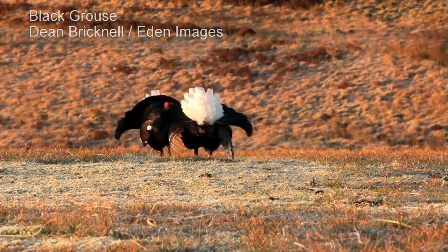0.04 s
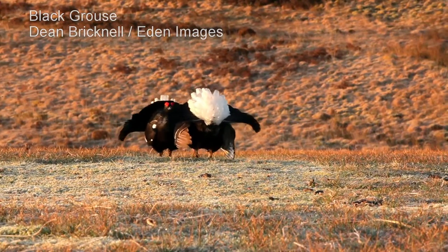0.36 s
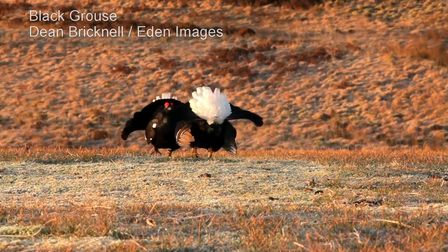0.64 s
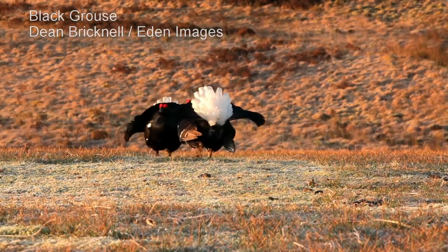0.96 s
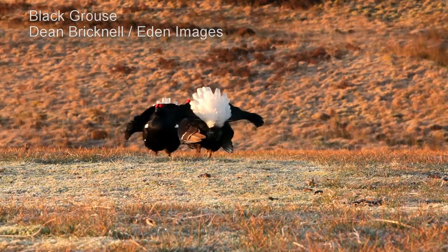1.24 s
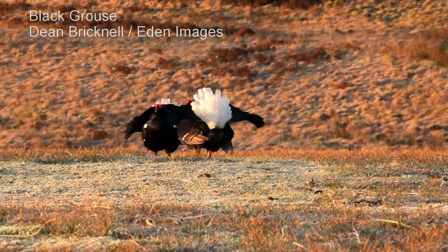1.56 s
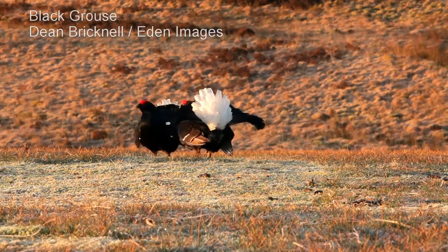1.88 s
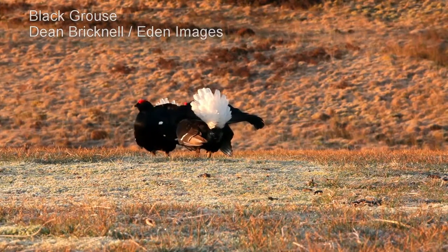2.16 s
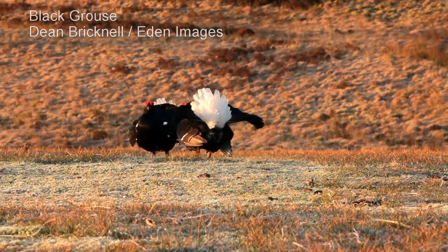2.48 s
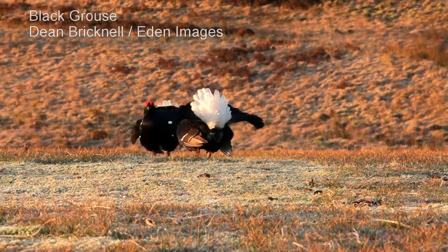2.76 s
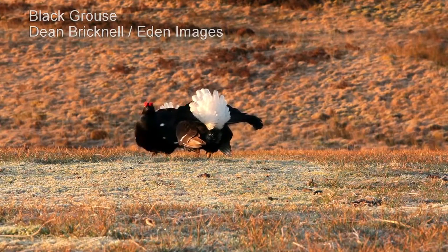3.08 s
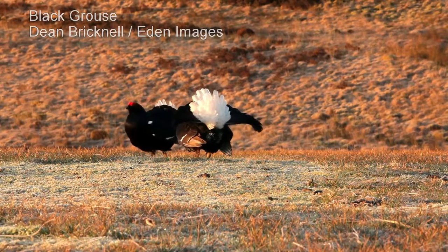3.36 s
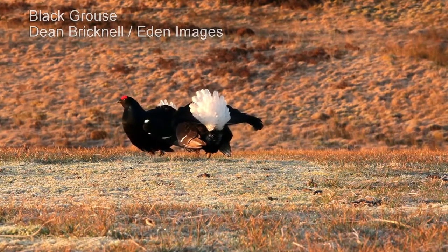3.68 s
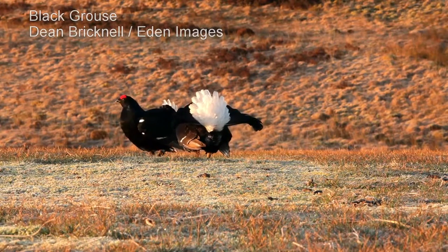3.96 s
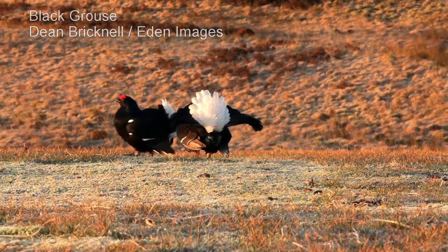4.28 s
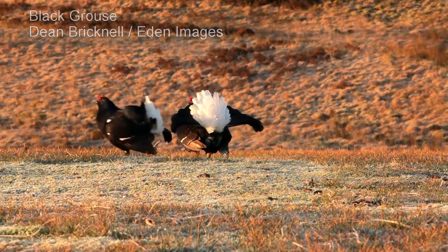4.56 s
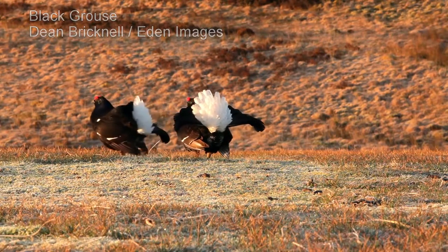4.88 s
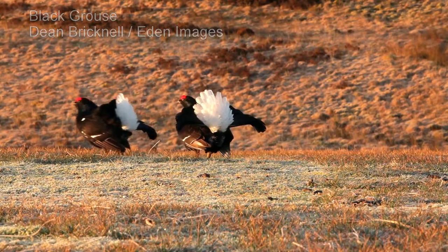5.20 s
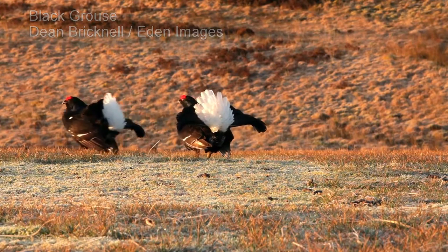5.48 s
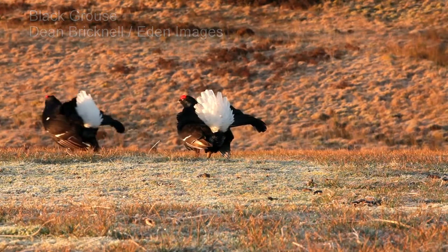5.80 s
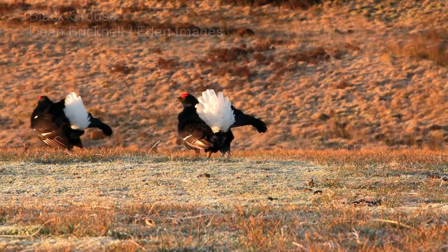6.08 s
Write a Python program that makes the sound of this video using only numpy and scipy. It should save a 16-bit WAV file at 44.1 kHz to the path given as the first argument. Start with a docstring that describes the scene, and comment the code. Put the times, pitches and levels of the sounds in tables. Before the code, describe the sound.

Low, rolling, bubbling coos of male grouse overlap over faint outdoor air, and a short rasping hiss comes late.

```python
"""Black grouse cocks sing one bubbling song over one another on open moorland: a climbing roll, then a
flourish of coos, each a gliding, nearly pure tone shaped by the resonance of the air sac.
Hoarse clucks sound at the start; near the end, air forced through a throat makes a harsh hiss.
Feathers rustle by friction, and feet tick and scuff in the frosty grass. Far birds whistle over
the soft rush of open air, an intermittent low hum and a faint steady whine."""
import sys
import numpy as np
from scipy import signal
from scipy.fft import rfft, irfft
from scipy.io import wavfile

SR = 44100
rng = np.random.default_rng(int(sys.argv[2]) if len(sys.argv) > 2 else 0)


def inscribe(sig):
    """Save sig as 16-bit PCM at rate SR to the path in sys.argv[1].

    A 1-D sig is mono; a 2-D sig holds one channel per row.
    Samples are clipped to [-1, 1] before scaling.
    """
    pcm = np.round(np.clip(np.atleast_2d(sig).T, -1, 1) * 32767)
    wavfile.write(sys.argv[1], SR, pcm.astype(np.int16))


N = 275184
TIME = np.arange(N) / SR

# Levels are relative within each source.
# Renditions of the song: start t/s, time stretch, pitch ratio, level/dB
RENDITIONS = [(-1.135, .9985, .997, 1.8), (1.448, .972, .98, -5.2), (2.759, 1, 1, 0),
              (3.870, .9795, .985, -4.8)]
# Coos, before any stretch or pitch ratio: t/s, duration/s, top f/Hz, level/dB, place of the top (0-1)
FLOURISH_COOS = [(0.735, 0.064, 568.0, -16.0, 0.39), (0.819, 0.035, 575.0, -14.2, 0.15),
                 (0.87, 0.035, 606.0, -15.0, 0.08), (1.161, 0.036, 563.0, -15.9, 0.24),
                 (1.262, 0.027, 607.0, -14.5, 0.14), (1.363, 0.025, 492.0, -17.8, 0.37),
                 (1.396, 0.038, 583.0, -18.1, 0.0), (1.451, 0.026, 496.0, -17.8, 1.0),
                 (1.483, 0.035, 482.0, -14.3, 0.5), (1.524, 0.077, 593.0, -19.6, 0.56),
                 (1.562, 0.029, 486.0, -21.1, 0.0), (1.648, 0.043, 538.0, -19.5, 0.0),
                 (1.759, 0.082, 523.0, -22.7, 0.41), (1.796, 0.04, 538.0, -14.6, 0.63),
                 (1.847, 0.059, 608.0, -20.9, 1.0), (1.892, 0.025, 499.0, -16.6, 0.76),
                 (1.95, 0.028, 596, -11.5, 0.46), (2.022, 0.07, 620, -10.3, 0.45),
                 (2.094, 0.152, 579.0, -23.2, 0.58), (2.103, 0.04, 582.0, -18.3, 1.0),
                 (2.129, 0.051, 501.0, -23.7, 0.74), (2.202, 0.029, 508.0, -14.3, 0.25)]  # t from the start of the song
SINGLE_COOS = [(0.233, 0.039, 574.0, -20.8, 0.3), (0.384, 0.046, 515.0, -17.2, 0.0),
               (0.461, 0.03, 483.0, -15.7, 0.0), (0.849, 0.026, 570.0, -21.6, 0.03),
               (0.877, 0.037, 424.0, -22.4, 0.76), (1.068, 0.054, 486.0, -20.3, 0.56),
               (1.152, 0.03, 552.0, -19.9, 0.11), (1.287, 0.027, 573.0, -16.9, 0.0),
               (1.362, 0.027, 581.0, -21.6, 0.0), (1.778, 0.073, 438.0, -19.0, 1.0),
               (2.352, 0.03, 444.0, -20.7, 0.0), (2.62, 0.076, 409.0, -23.1, 0.49),
               (2.69, 0.025, 453.0, -21.5, 0.68), (2.818, 0.118, 439.0, -19.2, 0.65),
               (3.795, 0.025, 582.0, -20.4, 0.0), (4.09, 0.053, 426.0, -19.8, 0.32),
               (4.288, 0.025, 479.0, -15.0, 0.55), (4.312, 0.073, 436.0, -18.6, 0.47),
               (5.28, 0.047, 451.0, -18.9, 0.58), (5.602, 0.061, 480.0, -21.9, 0.67),
               (5.712, 0.03, 540, -19.5, 0.2)]
# Radiation response of the air sac: f/Hz, gain/dB
SAC_RESPONSE = [(270, -24), (335, -6), (390, 0.5), (620, -0.5), (670, -12), (760, -29)]
# Cocks further off
CHORUS_ENVELOPE = [(0, -38), (1.05, -34.5), (1.22, -49), (1.5, -36), (1.85, -33), (2.2, -36), (2.45, -42),
                   (2.9, -36), (3.1, -41), (3.55, -37), (3.75, -40), (4.3, -32), (4.85, -35), (5.08, -43),
                   (5.4, -38), (6.24, -39)]  # t/s, level/dB
CHORUS_CONTOUR = [(1.1, 493), (1.5, 410.3), (1.9, 444), (2.2, 481.5)]  # t/s, base f/Hz
# Nasal clucks
CLUCK_NOTES = [(-.02, .04, -30.5, 541, 540, 510), (0.014, 0.055, -39.5, 525, 555, 560),
               (.078, 0.039, -31, 570, 548, 497), (0.136, 0.028, -39.5, 540, 514, 515)]  # t/s, duration/s, level/dB, start f/Hz, middle f/Hz, end f/Hz
CLUCK_HARMONICS = [(1, 1.5), (2, -0.5), (3, -1), (4, -16)]  # harmonic number, level/dB
# The hiss: its sinking half-whistle, throat resonances and broadband breath
HISS_GLIDE = [(5.47, 3080, -56), (5.52, 3020, -45), (5.62, 2830, -48), (5.72, 2740, -48), (5.8, 2600, -55),
              (5.88, 2380, -53), (5.96, 1850, -60)]  # t/s, f/Hz, level/dB
THROAT_FORMANTS = [(5.435, .1, -45.5, 790, 5980), (5.45, .082, -51, 350, 4250),
                   (5.547, .49, -51, 900, 5700), (5.583, .18, -48.5, 700, 7280),
                   (5.6, .33, -53.5, 400, 3900), (5.62, .3, -51, 350, 4900), (5.649, .24, -45.5, 180, 1310),
                   (5.7, .29, -50, 1300, 8300)]  # t/s, duration/s, level/dB, width/Hz, centre f/Hz
BREATH_ENVELOPE = [(5.42, -56), (5.5, -46.5), (5.58, -46.5), (5.69, -42.5), (5.8, -42.5), (5.9, -43.5),
                   (6.0, -58)]  # t/s, level/dB
BREATH_SPECTRUM = [(1200, -30), (2400, -4), (3600, -2.5), (7000, -3), (9500, -5.5), (12000, -10.5),
                   (15800, -22)]  # f/Hz, level/dB
# Ticks of feet and quills: t/s, level/dB, centre f/Hz
SNAPS = [(0.1141, -36.5, 6940), (0.3097, -37.5, 7810), (0.3501, -39, 7280), (0.4369, -39.5, 6170),
         (0.9598, -39.5, 6360), (1.1443, -40.5, 8520), (2.6996, -41.5, 7180), (3.6905, -41.5, 6210),
         (4.5096, -40, 3430), (5.1454, -27.5, 7160)]
# Wings and feet on the turf
SCUFF_STROKES = [(0.193, .02, -55), (2.378, 0.023, -46.5), (4.229, 0.026, -44), (4.256, 0.039, -47),
                 (4.283, 0.088, -43.5), (4.501, 0.023, -47), (6.044, 0.023, -43.5), (6.075, .02, -50),
                 (6.105, 0.076, -44)]  # t/s, duration/s, level/dB
SCUFF_SPECTRUM = [(500, -7), (1300, 5.5), (3500, 4), (7500, 1.5), (10000, -20), (16000, -21)]  # f/Hz, level/dB
# Rubbing feathers
RUSTLE_ENVELOPE = [(0.06, -47), (0.28, -56.5), (0.7, -54.5), (1.0, -51), (1.6, -60), (2.17, -48),
                   (2.55, -60.5), (3.4, -53), (4.0, -62.5), (5.4, -62)]  # t/s, level/dB
RUSTLE_SPECTRUM = [(2000, -17), (3800, -3.5), (4600, -2), (7800, 0.5), (10000, -14.5), (16000, -20)]  # f/Hz, level/dB
# Long notes of far birds, and a small bird's quick chirps
FAR_NOTES = [(.167, .26, -48, 1635), (.494, .26, -54.5, 1725), (.5, .75, -61, 4620), (.9, .11, -53, 1785),
             (1.17, .3, -56.5, 2300), (1.42, .1, -53, 1795), (1.648, .39, -57, 2370),
             (2.152, .29, -56.5, 2350), (2.619, .3, -58.5, 2340)]  # t/s, duration/s, level/dB, f/Hz
CHIRP_NOTES = [(2.342, .045, -53, 4150, 3950, 3800), (2.386, .13, -55, 5050, 5350, 4850),
               (5.99, .025, -53, 3550, 4800, 5400)]  # t/s, duration/s, level/dB, start f/Hz, middle f/Hz, end f/Hz
# Open air, and a breeze over the far slope
AIR_SPECTRUM = [(20, -7), (40, -9), (75, 3.5), (130, 2), (260, 4.5), (750, -4.5), (1400, -4), (2200, -10),
                (3500, -14), (8000, -16.5), (11000, -22), (16000, -23.5)]  # f/Hz, level/dB
BREEZE_ENVELOPE = [(1.2, -69), (2.6, -56.5), (3.5, -52), (4.6, -56), (6.2, -61)]  # t/s, level/dB
# Faint background tones
HUM_TONES = [(-.1, 0.64, -56, 71), (2.5, 1.05, -59.5, 76), (5.42, .62, -60.5, 69.9)]  # t/s, duration/s, level/dB, f/Hz
WHINE_TONES = [(2929, -67.5), (7812.5, -67.5), (9765.6, -70), (11718.7, -73.5)]  # f/Hz, level/dB


def coo(length, top_hz, db, top_at, rest_hz=390, sac_hz=493, sac_width_hz=92, droop_hz=74, droop_s=.006):
    """Forced resonance: an arching tone is reinforced as it sweeps through the air sac's frequency."""
    way = np.linspace(0, 1, max(int(length * SR), 8))
    hz = top_hz - (top_hz - rest_hz) * ((way - top_at) / max(top_at, 1 - top_at)) ** 2
    sac_gain = 1 / np.hypot(1, 2 * (hz - sac_hz) / sac_width_hz)
    hz = hz - droop_hz * np.exp((way - 1) * length / droop_s)  # the pitch droops at the last moment
    quiver_db = 1.6 * drift(len(way), rate=130)
    swell = abs(np.sin(np.pi * way)) ** .72 * amp(db + quiver_db)
    return swell * sac_gain * np.sin(2 * np.pi * (np.cumsum(hz) / SR + rng.random()))


def roll(count=11, start_s=-.031, step_s=.0709, first_hz=428, last_hz=558, first_db=-26, last_db=-14.5):
    """Periodic repetition: rows for the song's opening coos, which shorten, swell and climb late."""
    notes = []
    for k, way in enumerate(np.linspace(0, 1, count)):
        length = .063 * (1 - .22 * way)
        top_hz = first_hz + (last_hz - first_hz) * way ** 3.5
        db = first_db + (last_db - first_db) * way
        notes.append((start_s + k * step_s, length, top_hz, db, .05))  # early top: each note falls
    return notes


def near_cocks(song_db=.2, single_db=-.2):
    """Superposition: each cock sings at his own pace, pitch and level; others add single coos."""
    out = np.zeros(N)
    for start, stretch, ratio, level_db in RENDITIONS:
        for s, length, top_hz, db, top_at in roll() + list(FLOURISH_COOS):
            onset = start + s * stretch
            if onset > -length:
                add(out, onset, coo(length * stretch, top_hz * ratio, song_db + level_db + db, top_at))
    for s, *note in SINGLE_COOS:
        add(out, s, amp(single_db) * coo(*note))
    return out


def far_cocks(level_db=-1.0, note_s=.052, pitch_spread=.12, count=200):
    """Incoherent summation: many falling coos of random phase merge into a distant bubbling."""
    out = np.zeros(N)
    for k, (late, high, long) in enumerate(rng.uniform(-1, 1, (count, 3))):
        onset = (k + late / 2) / count * N / SR - note_s / 2
        hz = contour(onset, CHORUS_CONTOUR) * (1 + pitch_spread * high)
        swell, phase = arch(note_s * (1 + .28 * long), hz * 1.03, hz * 1.08, hz * .8, crest=.68)
        add(out, onset, swell * np.sin(phase))
    return unit_rms(out) * amp(level_db + contour(TIME, CHORUS_ENVELOPE))


def clucks(jitter_rad=.16):
    """Phase modulation: random jitter makes the harmonics of short, open-beaked notes hoarse."""
    out = np.zeros(N)
    for s, length, db, *pitches in CLUCK_NOTES:
        swell, phase = arch(length, *pitches)
        phase = phase + jitter_rad * drift(len(phase), rate=220)
        tone = sum(amp(db + part_db) * np.sin(round(k) * phase) for k, part_db in CLUCK_HARMONICS)
        add(out, s, swell * tone)
    return out


def hiss(rasp_db=1.4, rasp_hz=300, whistle_width_hz=260):
    """Source and filter: throat resonances shape forced air into a sinking whistle and a rasping rush."""
    whistle, rush = np.zeros(N), np.zeros(N)
    s, hz, db = np.transpose(HISS_GLIDE)
    t = np.arange(s[0], s[-1], 1 / SR)
    glide = resonant_noise(len(t), np.interp(t, s, hz), whistle_width_hz)
    add(whistle, s[0], amp(np.interp(t, s, db)) * glide)
    for s, length, db, width, hz in THROAT_FORMANTS:
        swell, _ = arch(length, hz, hz, hz)
        add(rush, s, amp(db) * np.sqrt(swell) * resonant_noise(len(swell), hz, width))
    s, db = np.transpose(BREATH_ENVELOPE)
    t = np.arange(s[0], s[-1], 1 / SR)
    breath = coloured(rng.standard_normal(len(t)), BREATH_SPECTRUM)
    add(rush, s[0], breath * amp(np.interp(t, s, db)))
    return (whistle + windpipe(rush)) * amp(rasp_db * drift(N, rasp_hz))


def windpipe(x, spacing_hz=485, reflection=.44):
    """Comb filtering: reflections along the windpipe leave evenly spaced ridges in the spectrum."""
    lag = round(SR / spacing_hz)
    feedback = np.r_[1, np.zeros(lag - 1), -reflection]
    return np.sqrt(1 - reflection ** 2) * signal.lfilter([1], feedback, x)


def ticks(level_db=-2, t60=.034):
    """Damped transients: stiff stalks and quills snap in a spray of treble that decays exponentially."""
    out = np.zeros(N)
    t = np.arange(SR // 10) / SR
    for s, db, hz in SNAPS:
        band = [(.33 * hz, -22), (.59 * hz, -1), (1.23 * hz, 0), (1.52 * hz, -14), (2.1 * hz, -22)]
        spray = coloured(rng.standard_normal(len(t)), band)
        add(out, s, spray * amp(level_db + db - 60 * t / t60))
    return out


def scuffs(grain_db=3):
    """Sliding friction: wings and feet draw short strokes of gritty noise from the turf."""
    out = np.zeros(N)
    for s, length, db in SCUFF_STROKES:
        size = int(length * SR)
        grit = rng.standard_normal(size) * amp(grain_db * drift(size, rate=392))
        add(out, s, amp(db) * coloured(grit, SCUFF_SPECTRUM) * signal.windows.tukey(size, .6))
    return out


def rustle(grain_db=3.5, clump_db=1.4, ring_db=-13, ring_hz=4560):
    """Friction noise: feathers rub in small clumped grains, with a thin resonance among them."""
    grains = rng.standard_normal(N) * amp(grain_db * drift(N, rate=600) + clump_db * drift(N, rate=40))
    ring = amp(ring_db) * resonant_noise(N, ring_hz, width_hz=220)
    return (coloured(grains, RUSTLE_SPECTRUM) + ring) * amp(contour(TIME, RUSTLE_ENVELOPE))


def far_birds(sag=.02, flutter_db=2.0, waver=.7):
    """Scintillation: thin whistles and chirps flutter in level and phase on their way through the air."""
    out = np.zeros(N)
    sagging = [(s, length, db, hz * (1 + sag), hz, hz * (1 - sag)) for s, length, db, hz in FAR_NOTES]
    for s, length, db, start_hz, middle_hz, end_hz in sagging + CHIRP_NOTES:
        swell, phase = arch(length, start_hz, middle_hz, end_hz)
        jitter = waver * middle_hz / 2500 * drift(len(phase), rate=90.6)
        add(out, s, amp(db) * np.sqrt(swell) * np.sin(phase + jitter))
    return out * amp(flutter_db * drift(N, rate=50))


def moor(x, wet_db=-19, t60=.18, delay_s=.008):
    """Scattering: tussocks and the slope behind add a thin, short tail to the direct sound."""
    t = np.arange(SR // 2) / SR
    echoes = rng.standard_normal(len(t)) * amp(-60 * t / t60) * (t > delay_s)
    return x + amp(wet_db) * signal.fftconvolve(x, echoes / np.linalg.norm(echoes))[:N]


def air(level_db=-45, breeze_hz=1280, breeze_width_hz=900):
    """Flow noise: the steady broadband rush of open country, and a band that swells with a far breeze."""
    breeze = resonant_noise(N, breeze_hz, breeze_width_hz) * amp(contour(TIME, BREEZE_ENVELOPE))
    return coloured(rng.standard_normal(N), AIR_SPECTRUM) * amp(level_db) + breeze


def hum():
    """Simple harmonic motion: faint low sine tones fade in and out."""
    out = np.zeros(N)
    for s, length, db, hz in HUM_TONES:
        t = np.arange(int(length * SR)) / SR
        add(out, s, amp(db) * unit_rms(np.sin(2 * np.pi * hz * t)) * signal.windows.tukey(len(t), .3))
    return out


def whine():
    """A line spectrum: steady high sine tones sum to a faint whine."""
    return sum(amp(db) * unit_rms(np.sin(2 * np.pi * hz * TIME)) for hz, db in WHINE_TONES)


def arch(length, start_hz, middle_hz, end_hz, crest=.44):
    """Phase as the integral of frequency: envelope and phase of a swelling note on a parabolic glide."""
    way = np.linspace(0, 1, max(int(length * SR), 8))
    hz = np.polyval(np.polyfit([0, .5, 1], [start_hz, middle_hz, end_hz], 2), way)
    swell = np.sin(np.pi / 2 * np.interp(way, [0, crest, 1], [0, 1, 0])) ** 2
    return swell, 2 * np.pi * (np.cumsum(hz) / SR + rng.random())


def resonant_noise(size, hz, width_hz):
    """Resonance: noise through two cascaded stages, each width_hz wide and centred on hz, at rms 1."""
    carrier = np.exp(2j * np.pi * np.cumsum(hz * np.ones(size)) / SR)
    pole = np.exp(-np.pi * width_hz / SR)
    baseband = signal.lfilter([(1 - pole) ** 2], [1, -2 * pole, pole ** 2],
                              rng.standard_normal(size) / carrier)
    return unit_rms((carrier * baseband).real)


def filtered(x, response):
    """Linear filtering by (f/Hz, gain/dB) points, joined on a logarithmic frequency axis."""
    hz, db = np.transpose(response)
    log_hz = np.log(np.fft.rfftfreq(len(x), 1 / SR) + 1)
    return irfft(rfft(x) * amp(np.interp(log_hz, np.log(hz), db)), len(x))


def coloured(x, spectrum):
    """Spectral shaping, at rms 1."""
    return unit_rms(filtered(x, spectrum))


def drift(size, rate):
    """Random modulation: straight lines join Gaussian values drawn rate times a second."""
    return np.interp(np.arange(size) / SR * rate, np.arange(SR), rng.standard_normal(SR))


def contour(t, points):
    """Linear interpolation of (t/s, value) points."""
    return np.interp(t, *np.transpose(points))


def amp(db):
    """Amplitude ratio of a level in decibels."""
    return 10 ** (np.asarray(db) / 20)


def unit_rms(x):
    """Normalisation to rms 1."""
    return x / np.sqrt(np.mean(x ** 2) + 1e-20)


def add(mix, s, sound):
    """Superposition of a sound on the mix, starting at s seconds."""
    at = round(s * SR)
    sound = sound[max(-at, 0):]
    part = mix[max(at, 0):][:len(sound)]
    part += sound[:len(part)]


def scene():
    """Superposition of birds, grass and air in one channel."""
    bubbling = filtered(near_cocks() + far_cocks(), SAC_RESPONSE)
    direct = bubbling + clucks() + far_birds() + hiss() + ticks() + scuffs()
    return (moor(direct) + rustle() + air() + hum())[None]


def record(dry, cutoff_hz=15800):
    """Band limiting: the whine joins the scene, and a steep low-pass removes the highest treble."""
    low_pass = signal.firwin(511, cutoff_hz, window=("kaiser", 9), fs=SR)
    return signal.oaconvolve(dry + whine(), low_pass[None], "same")


dry = scene()
out = record(dry)
inscribe(out)
```